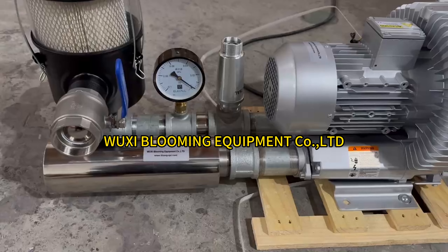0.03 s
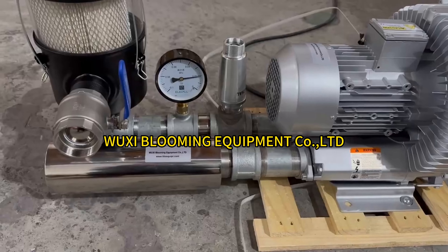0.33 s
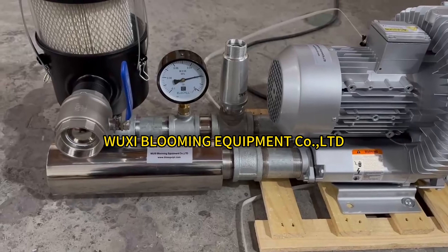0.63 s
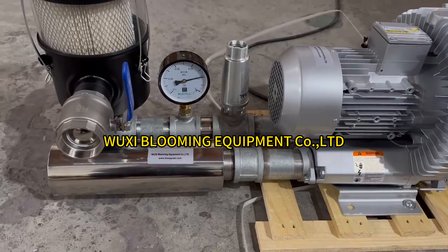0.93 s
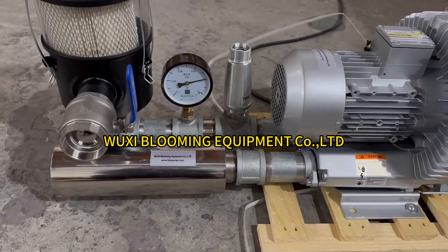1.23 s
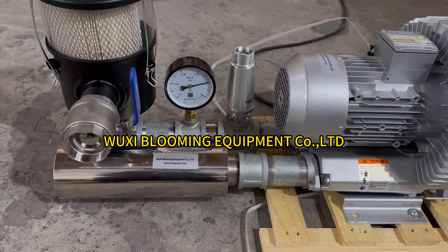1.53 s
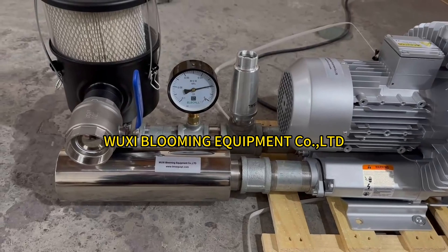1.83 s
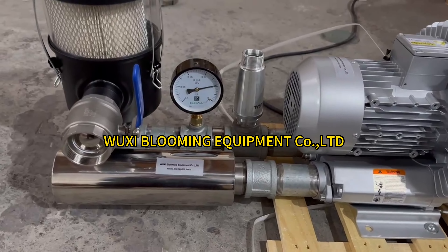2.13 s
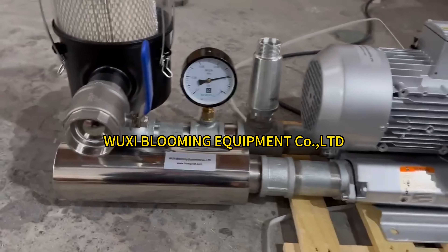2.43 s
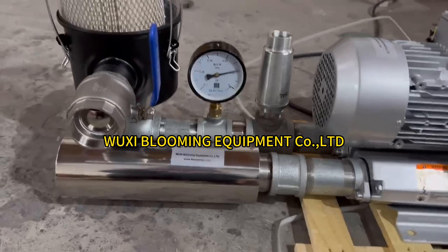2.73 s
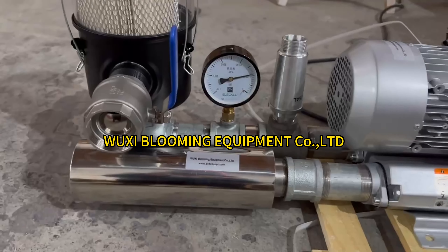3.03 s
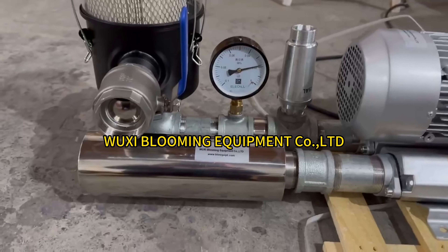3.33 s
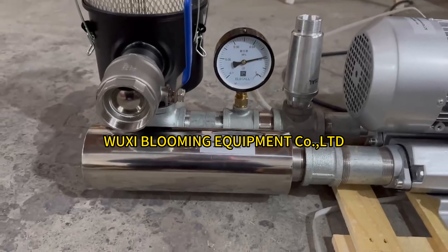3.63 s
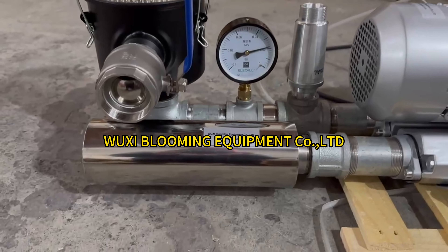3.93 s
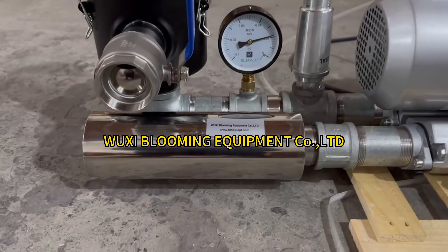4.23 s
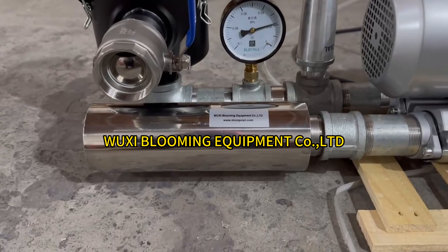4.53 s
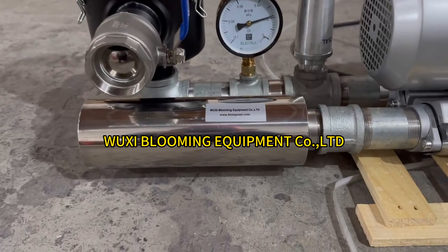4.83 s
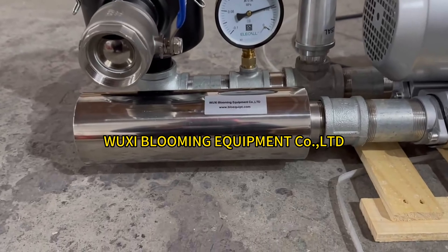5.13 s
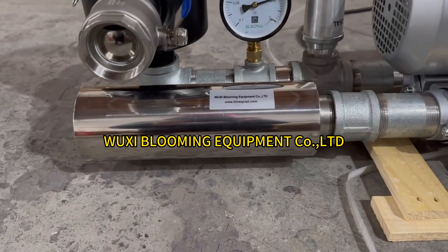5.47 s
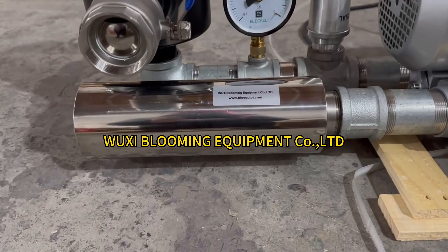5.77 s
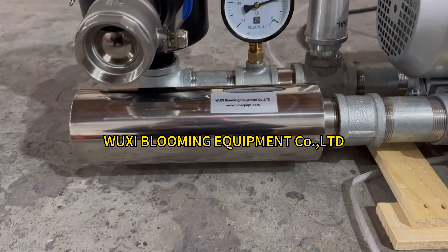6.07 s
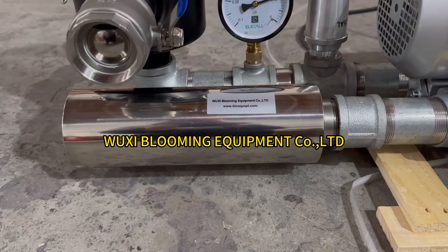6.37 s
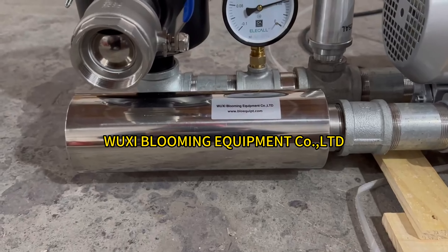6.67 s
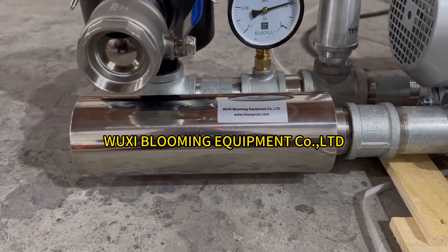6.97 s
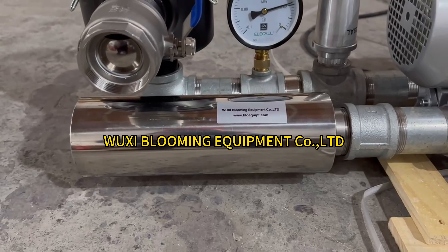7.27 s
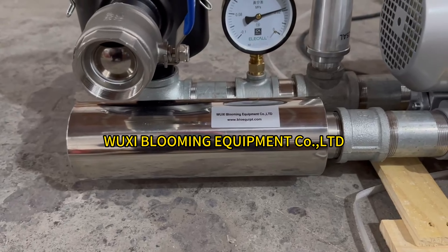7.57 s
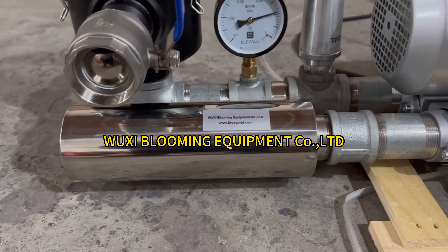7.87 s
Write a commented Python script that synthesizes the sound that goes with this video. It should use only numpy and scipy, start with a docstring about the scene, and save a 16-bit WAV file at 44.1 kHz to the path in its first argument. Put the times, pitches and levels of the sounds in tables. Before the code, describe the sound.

An electric blower switches on in a workshop, its whine sputtering and shooting up in pitch within a third of a second. A rush of air swells, then settles into a steady low rumble, roar and ringing pipe hiss over a faint motor hum. From about two seconds the hand-held microphone moves closer to the silencer, and the roar grows fuller and shifts in colour as the machine keeps running.

```python
"""A side-channel blower starts on a workshop floor. Its impeller whines up to speed in a third of a
second, sputtering and ringing the port. The air stream swells, then settles as the blower runs on as
a vacuum pump: rumble in the housing, roar in the silencer, ringing in the steel pipes and relief valve,
over a faint motor hum. From about 2 s a hand-held microphone moves in on the silencer, which changes
the strength and direction of the resonances."""
import sys
import numpy as np
from scipy import signal
from scipy.fft import rfft, irfft, next_fast_len
from scipy.io import wavfile
from scipy.ndimage import map_coordinates

SR = 44100
rng = np.random.default_rng(int(sys.argv[2]) if len(sys.argv) > 2 else 0)


def digitize_waveform(pressure):
    """Quantize a signal to 16-bit integers and store it at the path in sys.argv[1].

    Rows of a 2-D input are taken as channels; values are limited to [-1, 1].
    """
    field = np.atleast_2d(pressure).T
    bounded = np.clip(field, -1, 1)
    quanta = np.round(bounded * 32767).astype(np.int16)
    wavfile.write(sys.argv[1], SR, quanta)


N = 357210

# Impeller run-up. Each row: time in seconds, blade-passing rate in Hz.
BLADE_RATE = [(.04, 421), (.075, 496.6), (.1, 524.7), (.125, 603), (.152, 775), (.19, 870.3), (.23, 980),
              (.28, 1043), (.35, 1072), (8.1, 1075)]
# Swell of the air stream. Each row: time in seconds, gain in dB.
AIR_GAIN = [(0.04, 4), (0.25, 5.5), (0.55, 6), (0.85, 4), (1.25, 2.5), (1.6, 0.5), (2.1, 0.15), (3.1, 0.2),
            (4.6, -0.56), (6, 0.02), (8.1, -0.65)]
# Housing rumble. Each row: frequency in Hz, relative spectral density in dB.
RUMBLE_SPECTRUM = [(16, -60), (32, -32), (62, -6), (92, 1), (139, -4), (183, -4), (224, 1.5), (361, -11.5),
                   (480, -21), (620, -26), (1060, -120)]
# Silencer resonances. Each row: centre in Hz, width in Hz, then relative level in dB,
# left minus right in dB and left lead in radians from afar, then those three from close by.
SILENCER_MODES = [(530, 270, -1, -2, 2.06, -20.5, -7, 0.71), (608, 171, -0.5, -6.5, 2, 1.5, 4, 0.69),
                  (775, 166, -6.5, -13, -5, -3.5, 7.5, 0.67), (954, 235, -1.5, 7, 0.8, -8, 4, 2)]
# Steel pipe resonances. Columns as for the silencer.
PIPE_MODES = [(1304, 445, -6, 3.8, -0.19, -3, 4, 0.5), (1635, 126, -4.5, 3.9, 1, -5.5, 3, 1.8),
              (2050, 345, -2, 3, 0.76, -7.5, 6, 0.4), (2405, 121, 1, 6, -.2, 5.5, 7.5, -1.5),
              (2560, 67, -9, 2, .6, 2.5, 8, -2), (2645, 87, 8.5, 5.4, -.2, 5, 2, -2.5),
              (2964, 112, 6, 5.3, -1.2, 1.5, -2, 2), (3235, 195, -11.5, 1.8, -0.84, -11, 5, -2),
              (3776, 300, -6.5, 1.6, -1.37, -9.5, -3, -2)]
# Relief valve resonances. Columns as for the silencer.
VALVE_MODES = [(4388, 154, 0.5, 6, -1.9, -3, 1.5, 0.72), (4578, 83, 4, -8.5, 0, 0, 6.5, 1.5),
               (4960, 240, -2.5, -8, -.5, 1, -1.5, 0.82), (5544, 135, 1, 11, 1.1, 0, 6.5, 1.1),
               (5960, 210, -2.5, 1.5, 0.8, -5, 1.5, 1.8), (6412, 156, -4.5, 3, -0.26, 0.9, 2, 0.2),
               (6690, 190, -6.5, 1, 0, -19, 0, 2), (6910, 105, -8, 0, -0.81, -12.5, 0, 1),
               (7400, 160, -3.5, 0, 0.5, -8, -2, 1), (7860, 174, -2.5, 0, -0.09, -4, 0, -1),
               (8190, 250, -4.5, 1, 0.069, -5, -.6, .5), (8610, 107, 0.5, -1, 1.4, 1.9, 0.5, 2),
               (9640, 110, -8, 0, 0.89, -43, -4, 11), (10393, 77, 3, -0.5, 0.85, 5.5, -0.5, -3),
               (11160, 280, -5, 0, 0.029, -16.5, 1, 1.2), (12000, 360, -5, 0, -0.13, -8, 1, 0.54),
               (12530, 270, -30, 0, 0, -8, -1, 0.4), (14000, 440, -14, 0, 0.58, -16, 0, 1),
               (14540, 390, -15, 0, 0.81, -9.5, 0, 1.4), (15500, 310, -2, -1, 1.6, -13, 0, -3)]
# Bands cancelled or reinforced by bounces off the steelwork, from afar.
# Each row: centre in Hz, Gaussian width in Hz, left gain in dB, right gain in dB.
BOUNCE_BANDS = [(2502, 86, -5, -4), (2850, 65, -3, -3), (4316, 158, -6, -4), (4936, 166, 3, -1),
                (5462, 122, -6, -4), (6434, 129, 2, 2), (6999, 121, -5, -5), (7603, 146, 3, 3),
                (7986, 109, -8, -8)]
# Climb of those bands on the approach. Each row: time in seconds, frequency ratio.
BOUNCE_SHIFT = [(2, 1.0), (2.8, 1.02), (3.4, 1.064), (4, 1.104), (4.6, 1.144), (5.4, 1.148), (6, 1.133),
                (6.6, 1.099), (7.3, 1.076), (8.1, 1.07)]
# Sliding gap in the roar. Each row: time in seconds, centre in Hz, gain in dB.
ROAR_GAP = [(1.1, 800, -2), (1.6, 747, -2), (2.0, 590, -0.5), (2.35, 450, -2), (2.9, 418, -1.5)]
# Blade tone along the microphone's path. Each row: time in seconds, base level in dB.
TONE_LEVEL = [(0.1, -36), (0.25, -33.5), (0.36, -38.5), (0.7, -39), (1.8, -46), (2.8, -42), (4.2, -44.3),
              (5.6, -47.5), (7.3, -52)]
# Blade overtones and motor whine. Each row: multiple of the blade rate, relative level in dB at rest.
WHINE_PARTIALS = [(1.27, -12), (1.722, -2), (1.999, -7), (2.301, -10), (2.8, -10.5), (3, -12.5), (4, -13.5),
                  (5, -21)]
# Port resonances. Each row: centre in Hz, width in Hz, ringing gain in dB.
PORT_MODES = [(514, 22, 11), (597, 22, 7), (795, 26, 4), (942, 29, 11), (1026.5, 43, 12), (1340, 33, 1),
              (1440, 55, 10), (1535, 36, 10), (1610, 32, 7), (1690, 40, 16), (1985, 86, 8), (2490, 60, 13),
              (2610, 55, 7), (3100, 75, 13), (3300, 89, 21)]
# Hollow band of the roar. Each row: time in seconds, centre in Hz, level in dB at full speed.
HOLLOW_PATH = [(0.3, 1000, -33), (1.3, 965, -41), (1.8, 890, -36.5), (2.25, 743.6, -30), (2.9, 680, -36)]
# Motor hum. Each row: multiple of the shaft rate, level in dB at full speed.
HUM_PARTIALS = [(1, -49.5), (2, -38)]

# Each law: base level in dB, growth in dB per tenfold speed, drift in dB per second.
RUMBLE_LAW, SILENCER_LAW = (-23.5, 17, -0.55), (-31.5, 1.8, 0.0)
PIPE_LAW, VALVE_LAW = (-26, 35, -0.74), (-25.6, 49, -0.016)
BLADES = 22
SWITCH_ON_S, RISE_S = 0.036, 0.064
FACING_DB, FACING_S = 6, (2.07, 2.43)  # microphone turns to the silencer
SPUTTER_DB, SPUTTER_HZ, SLIP_RAD, SLIP_HZ = 5.5, 84.7, 1.5, 75


def airflow(shaft_rad, speed):
    """The air stream follows impeller speed, flutters and pulses once per shaft turn."""
    swell_db, = curves(AIR_GAIN)
    flutter_db = 0.097 * wobble(15) + 0.83 * wobble(70) + 0.33 * np.sin(shaft_rad)
    rumble = amp(flow_db(RUMBLE_LAW, speed) + 0.29 * wobble(16)) * vacuum_build(housing_rumble())
    roar = amp(flow_db(SILENCER_LAW, speed) + FACING_DB * ramp(*FACING_S))
    roar = roar * duct(SILENCER_MODES, direct=0.87, move_s=(1.8, 2.55))
    ring = amp(flow_db(PIPE_LAW, speed)) * duct(PIPE_MODES, direct=0.9, move_s=(2.17, 3.48))
    hiss = amp(flow_db(VALVE_LAW, speed)) * duct(VALVE_MODES, direct=0.95, move_s=(1.77, 3.2))
    stream = rumble + moving_filter(roar, roar_gap_db) + moving_filter(ring + hiss, steel_bounce_db)
    return amp(swell_db + flutter_db) * stream


def flow_db(law, speed):
    """Flow noise grows with speed and drifts as the microphone moves."""
    base_db, growth_db, drift_db_per_s = law
    return base_db + growth_db * np.log10(speed) + drift_db_per_s * np.arange(N) / SR


def housing_rumble(pan_db=1.5, lead_ms=0.39, direct=0.98):
    """Big eddies in the housing: deep, almost alike in both ears, slightly left."""
    hz = np.geomspace(10, SR / 2, 600)
    points_hz, db = np.transpose(RUMBLE_SPECTRUM)
    power = amp(np.interp(np.log(hz), np.log(points_hz), db)) ** 2
    shared = direct * power * np.exp(2j * np.pi * hz * lead_ms / 1000)
    return stereo_noise(hz, power * amp(pan_db), power * amp(-pan_db), shared)


def vacuum_build(rumble, below_hz=135, start_db=-14.5, build_s=(0.2, 0.46)):
    """The deepest rumble comes in as the vacuum builds."""
    throb = signal.sosfiltfilt(signal.butter(4, below_hz, fs=SR, output="sos"), rumble)
    gain = amp(start_db * (1 - ramp(*build_s)))
    return rumble + throb * (gain - 1)


def duct(modes, direct, move_s):
    """A duct's noise turns from its far sound to its close sound on the approach."""
    centre_hz, width_hz, *columns = np.transpose(modes)
    far = turbulence(centre_hz, width_hz, *columns[:3], direct)
    close = turbulence(centre_hz, width_hz, *columns[3:], direct)
    closeness = ramp(*move_s)
    return np.sqrt(1 - closeness) * far + np.sqrt(closeness) * close


def turbulence(centre_hz, width_hz, db, pan_db, lead_rad, direct):
    """Turbulence rings resonances; the share that is not direct comes diffusely from the room."""
    hz = np.linspace(0, SR / 2, 4097)
    detuning = (hz[:, None] - centre_hz) / width_hz
    power = (amp(db) / (1 + 2 * detuning ** 2)) ** 2
    shared = direct * power @ np.exp(1j * lead_rad)
    return stereo_noise(hz, power @ amp(pan_db), power @ amp(-pan_db), shared)


def steel_bounce_db(hz, time_s):
    """Direct and bounced sound interfere in bands that slide as the microphone moves."""
    far_hz = hz / np.interp(time_s, *np.transpose(BOUNCE_SHIFT))
    return sum(np.multiply.outer(ears_db, np.exp(-((far_hz - centre_hz) / width_hz) ** 2 / 2))
               for centre_hz, width_hz, *ears_db in BOUNCE_BANDS)


def roar_gap_db(hz, time_s, width_hz=88):
    """A shallow dip slides down through the roar's midrange."""
    points_s, centre_hz, db = np.transpose(ROAR_GAP)
    offset_hz = hz - np.interp(time_s, points_s, centre_hz)
    return np.interp(time_s, points_s, db) * np.exp(-(offset_hz / width_hz) ** 2 / 2)


def impeller_whine(blade_rad, speed, strain_db=5.5, rough_rad=0.84, waver_db=1.5, lead_rad=1.12):
    """Blades chop the air at the port: louder, rougher and brighter while the impeller labours."""
    strain = np.sqrt(np.clip(1 - speed, 0, 1))
    phase_rad = blade_rad + 0.25 * wobble(13) + rough_rad * strain * wobble(170.3)

    def partial(multiple):
        """Under strain a partial sputters and slips in phase, breaking up the glide."""
        sputter = amp(SPUTTER_DB * np.sqrt(strain) * wobble(SPUTTER_HZ))
        slip_rad = SLIP_RAD * np.sqrt(strain) * wobble(SLIP_HZ)
        return sputter * np.sin(multiple * phase_rad + slip_rad + np.array([[lead_rad], [0]]))

    tone = partial(1) + strain * sum(amp(db) * partial(multiple) for multiple, db in WHINE_PARTIALS)
    base_db, = curves(TONE_LEVEL)
    level_db = base_db + strain_db * strain + waver_db * np.array([wobble(15), wobble(20)])
    return np.sqrt(2) * amp(level_db) * tone


def port_ringing(tone):
    """The port's resonances ring on briefly after the tone sweeps through them."""
    size = next_fast_len(N + SR // 2)
    hz = np.fft.rfftfreq(size, 1 / SR)
    ring = sum(amp(db) * 1j * hz * width_hz / (centre_hz ** 2 - hz ** 2 + 1j * hz * width_hz)
               for centre_hz, width_hz, db in PORT_MODES)
    return irfft(rfft(tone, size) * (1 + ring), size)[:, :N]


def hollow_band(speed, width_hz=190, lead_rad=0.67, pan_db=8):
    """A narrow band of air noise slides down in pitch."""
    centre_hz, db = curves(HOLLOW_PATH)
    phase_rad = 2 * np.pi * np.cumsum(centre_hz) / SR + np.array([[lead_rad], [0]])
    band = wobble(width_hz) * np.cos(phase_rad) + wobble(width_hz) * np.sin(phase_rad)
    return speed ** 2 * amp(db) * unit_rms(pan(band, pan_db))


def motor_hum(shaft_rad, speed, pan_db=-0.5):
    """Shaft harmonics that grow with speed and wander slightly in phase."""
    hum = sum(amp(db) * np.sin(multiple * shaft_rad + 0.33 * wobble(5)) for multiple, db in HUM_PARTIALS)
    return pan(np.sqrt(2) * speed ** 2 * hum, pan_db)


def stereo_noise(hz, left_power, right_power, shared_power):
    """Noise with a power spectrum per ear and a complex cross-spectrum between them."""
    size = next_fast_len(N)
    common, separate = rfft(rng.standard_normal((2, size)))
    per_bin = lambda gain: np.interp(np.fft.rfftfreq(size, 1 / SR), hz, gain)
    common_gain = np.conj(shared_power) / np.sqrt(left_power)
    separate_gain = np.sqrt(np.abs(right_power - np.abs(common_gain) ** 2))
    left = common * per_bin(np.sqrt(left_power))
    right = common * per_bin(common_gain) + separate * per_bin(separate_gain)
    return unit_rms(irfft([left, right], size)[:, :N])


def moving_filter(pair, gain_db):
    """Filter by gain_db(hz, time_s)."""
    hz, time_s, spectra = signal.stft(pair, SR, nperseg=1024)
    _, filtered = signal.istft(spectra * amp(gain_db(hz[:, None], time_s)), SR, nperseg=1024)
    return filtered[:, :N]


def amp(db):
    """Decibels to gain."""
    return 10 ** (np.asarray(db) / 20)


def pan(sound, db):
    """Set left minus right in dB."""
    return sound * amp([[db / 2], [-db / 2]])


def unit_rms(pair):
    """Scale a pair so its mid signal has rms 1."""
    return pair / np.sqrt(np.mean(pair.mean(0) ** 2) + 1e-20)


def curves(rows):
    """One value per sample for each column after the time."""
    time_s, *columns = np.transpose(rows)
    return [np.interp(np.arange(N) / SR, time_s, column) for column in columns]


def wobble(rate_hz):
    """Smooth random curve, rate_hz knots a second."""
    knots = rng.standard_normal(int(N * rate_hz / SR) + 4)
    return map_coordinates(knots, [np.arange(N) * rate_hz / SR])


def ramp(start_s, end_s):
    """Linear rise from 0 to 1, then held."""
    return np.clip((np.arange(N) / SR - start_s) / (end_s - start_s), 0, 1)


def scene():
    """Shaft speed drives the whine, the hum and the air stream."""
    blade_hz, = curves(BLADE_RATE)
    blade_rad = 2 * np.pi * np.cumsum(blade_hz) / SR
    shaft_rad = blade_rad / BLADES
    speed = blade_hz / blade_hz[-1]
    whine = port_ringing(impeller_whine(blade_rad, speed))
    hum = motor_hum(shaft_rad, speed)
    air = airflow(shaft_rad, speed) + hollow_band(speed)
    onset = np.sqrt(ramp(SWITCH_ON_S, SWITCH_ON_S + RISE_S))
    return onset * (air + whine + hum)


def record(dry, top_hz=15800):
    """Brick-wall low-pass at the microphone's band limit."""
    size = next_fast_len(N + SR // 2)
    passband = np.fft.rfftfreq(size, 1 / SR) < top_hz
    return irfft(rfft(dry, size) * passband, size)[:, :N]


dry = scene()
out = record(dry)
digitize_waveform(out)
```